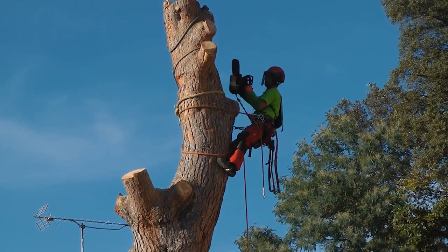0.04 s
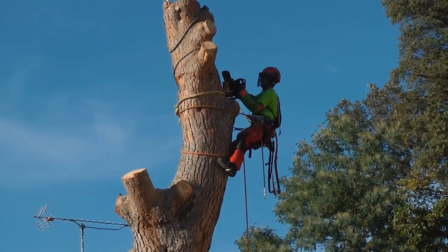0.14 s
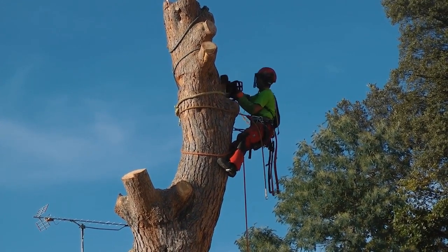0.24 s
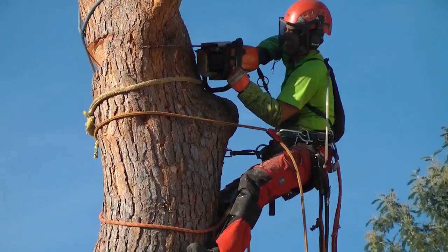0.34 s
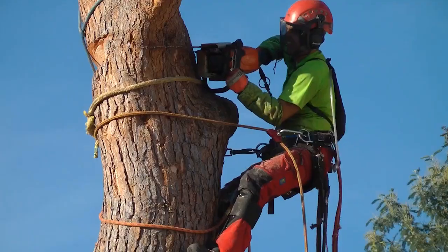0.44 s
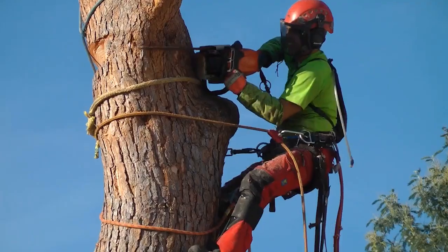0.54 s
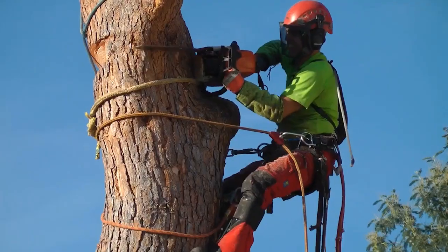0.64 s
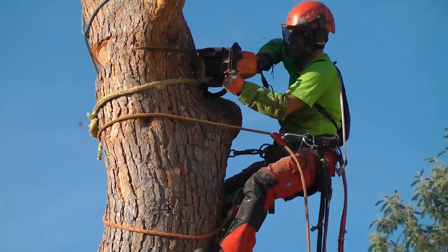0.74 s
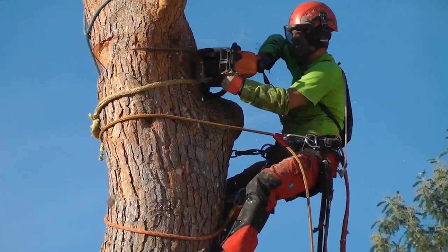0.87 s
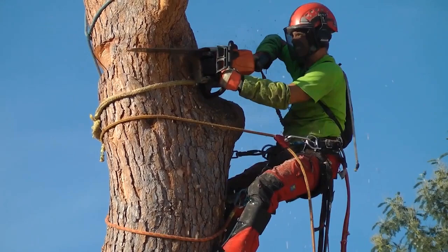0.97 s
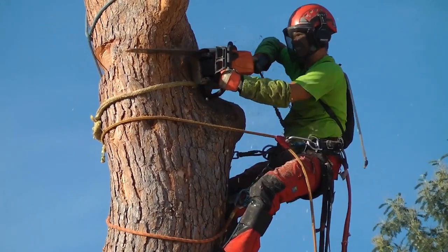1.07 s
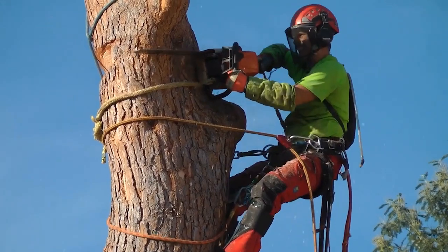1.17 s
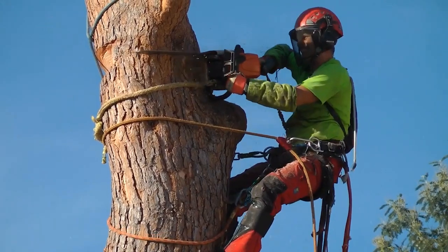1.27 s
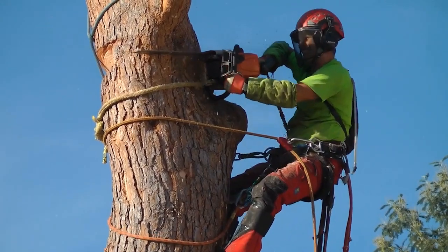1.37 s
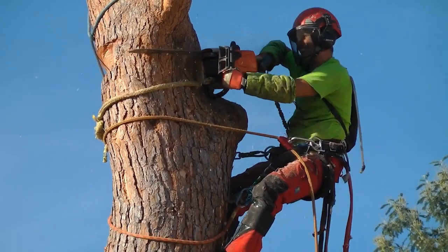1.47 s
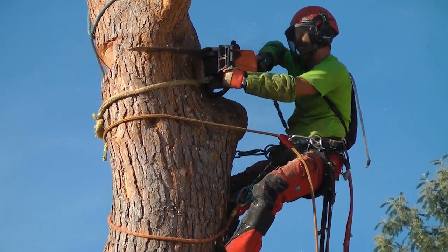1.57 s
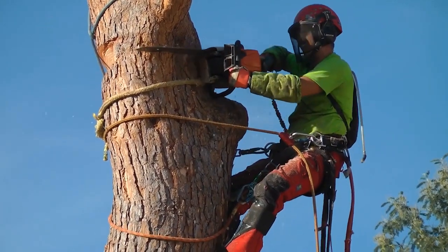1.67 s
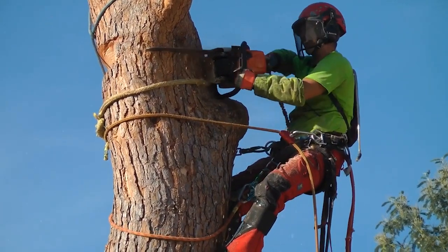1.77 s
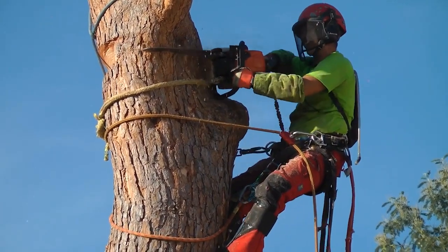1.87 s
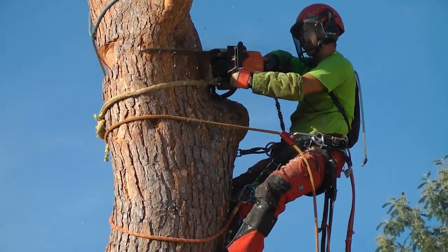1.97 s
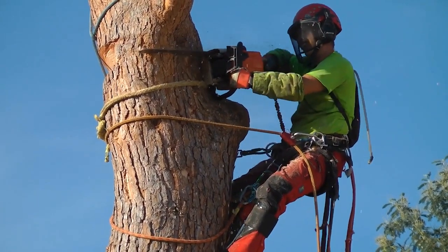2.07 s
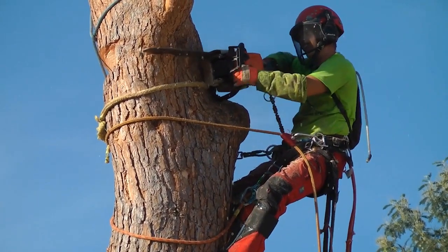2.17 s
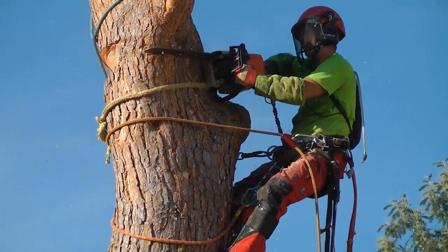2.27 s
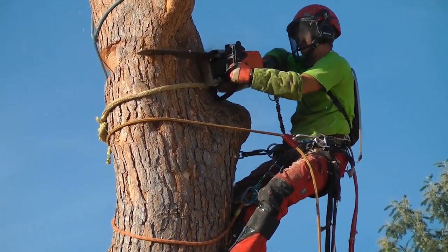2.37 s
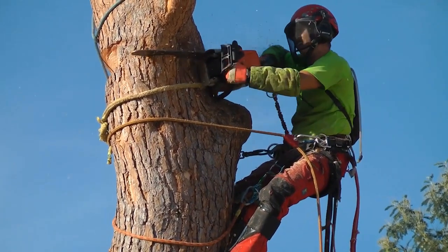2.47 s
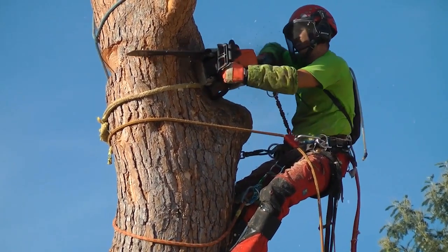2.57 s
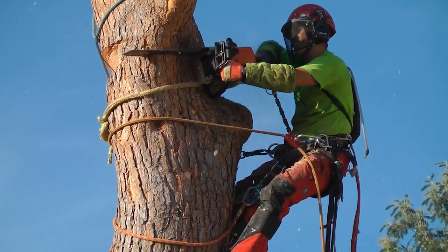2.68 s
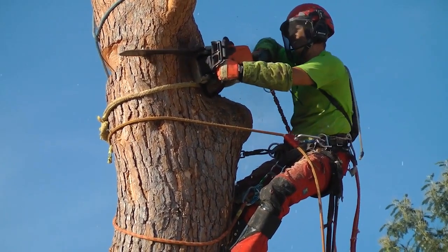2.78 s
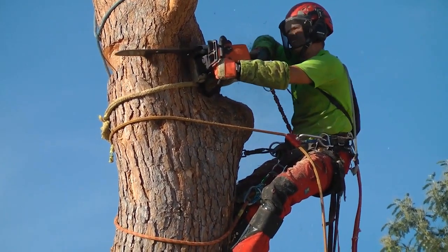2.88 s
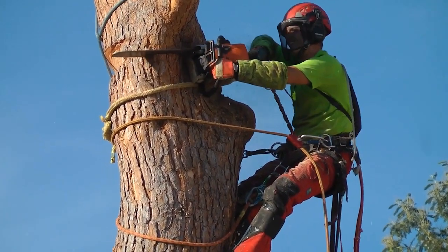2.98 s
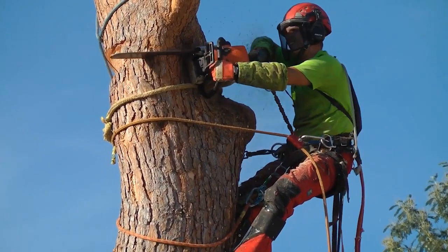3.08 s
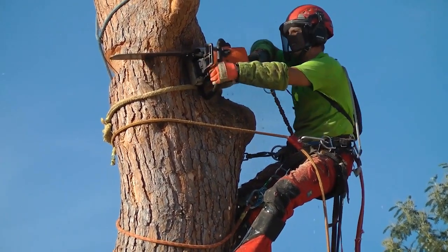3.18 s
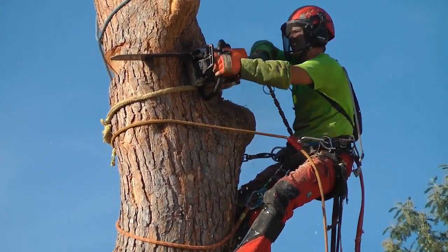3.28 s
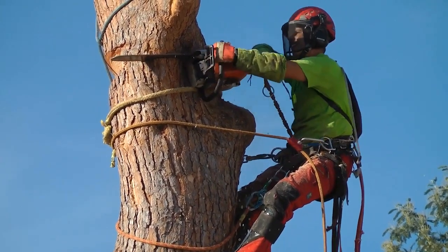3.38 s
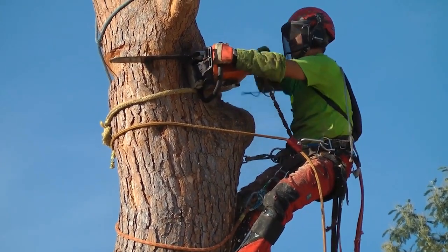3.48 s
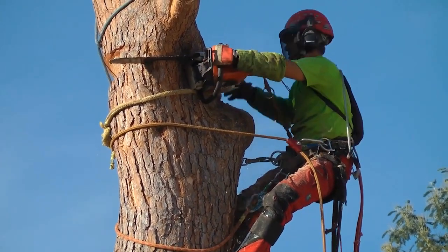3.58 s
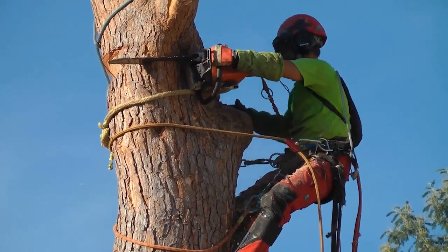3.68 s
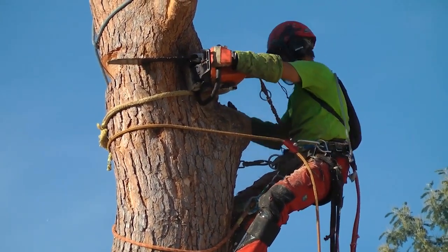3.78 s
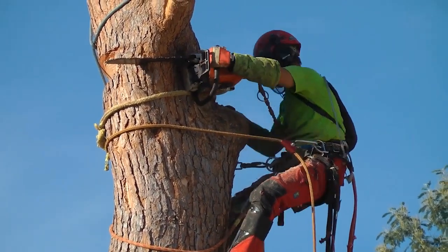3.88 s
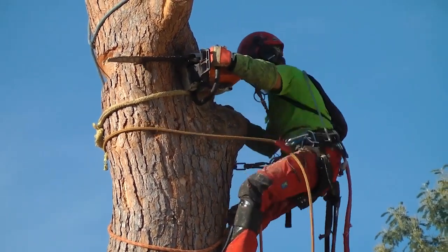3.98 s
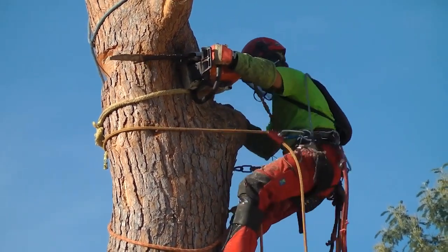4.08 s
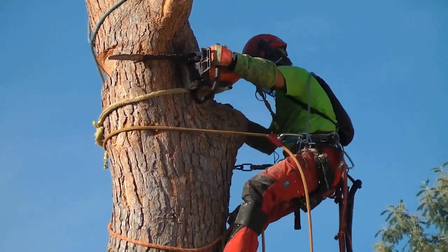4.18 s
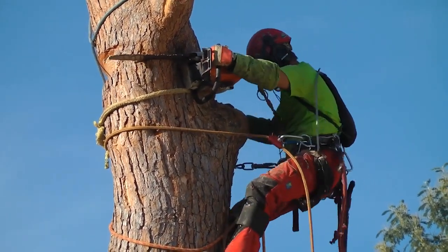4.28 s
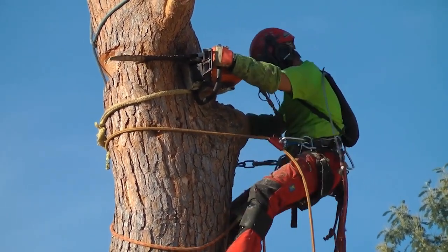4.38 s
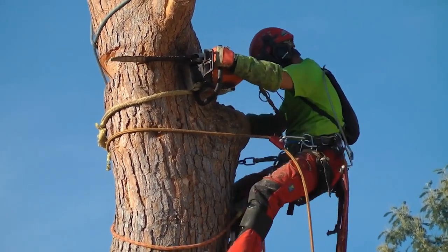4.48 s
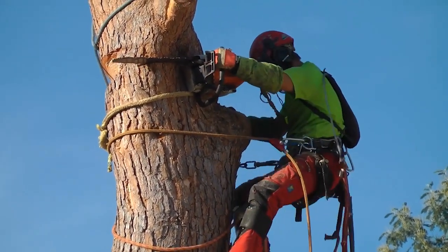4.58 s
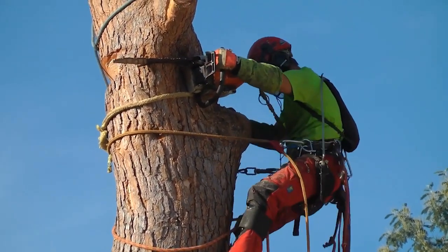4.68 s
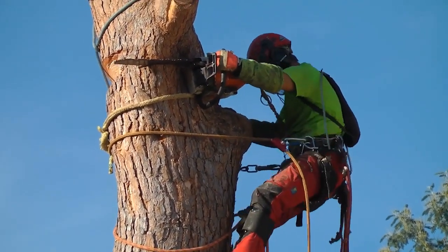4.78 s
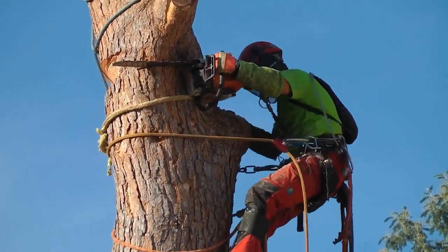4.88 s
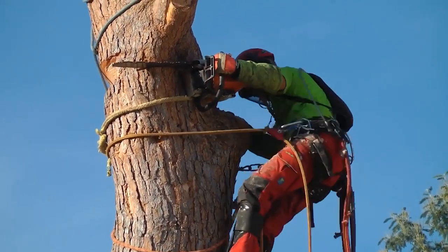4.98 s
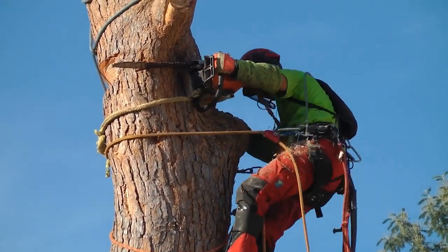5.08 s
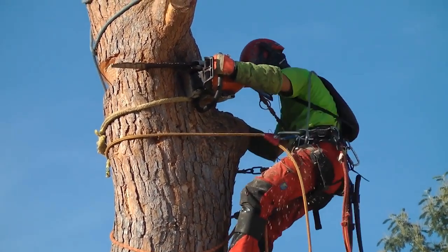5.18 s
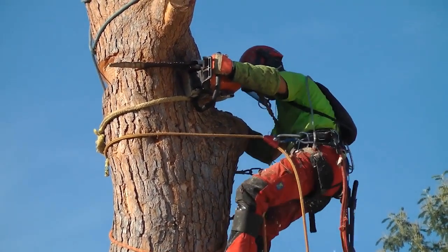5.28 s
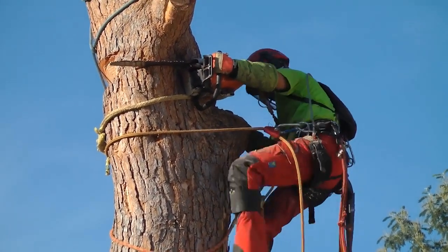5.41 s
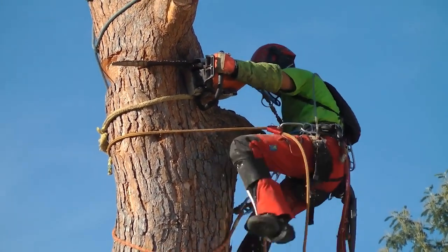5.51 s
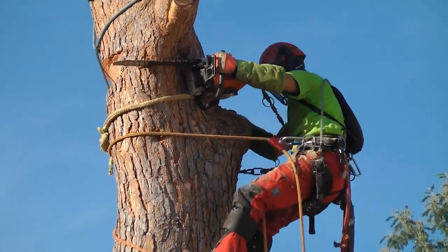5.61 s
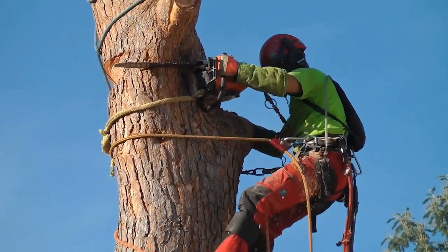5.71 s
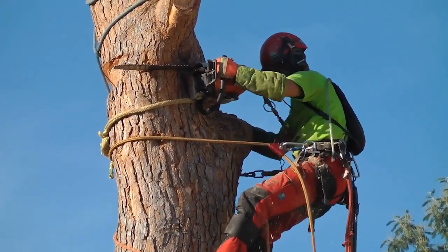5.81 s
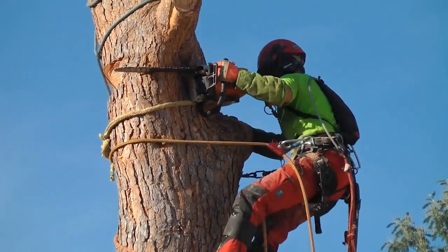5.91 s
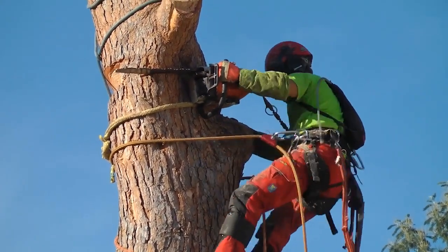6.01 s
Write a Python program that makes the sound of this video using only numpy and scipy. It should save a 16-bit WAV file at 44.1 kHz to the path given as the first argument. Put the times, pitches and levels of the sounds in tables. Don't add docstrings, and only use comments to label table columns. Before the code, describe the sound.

A small two-stroke chainsaw idles faintly, jumps closer, revs hard into a trunk, bogs once, then runs down to a lumpy, rattling idle outdoors.

```python
import sys
import numpy as np
from scipy import signal
from scipy.fft import rfft, irfft, next_fast_len
from scipy.io import wavfile
from scipy.ndimage import uniform_filter1d

SR = 44100
rng = np.random.default_rng(int(sys.argv[2]) if len(sys.argv) > 2 else 0)


def put_to_file(sound):
    columns = np.atleast_2d(sound).T
    safe = np.clip(columns, -1, 1)
    whole_steps = np.round(safe * 32767)
    wavfile.write(sys.argv[1], SR, whole_steps.astype(np.int16))


def boost(x):
    u = np.asarray(x, float) / 20
    return 10 ** u


N = 266805

NEARER_S = .44
THROTTLE_S = .6675
SHUT_S = 3.24


def saw():
    t = np.arange(N) / SR
    hz, exhaust_db, rattle_db, throttle, misfire, whine_db = controls(t)
    hz = uniform_filter1d(hz, 300)
    throttle, misfire = np.clip([throttle, misfire], 0, 1)
    misfire = np.maximum(misfire, (1 - throttle) * np.clip((140 - hz) / 55, 0, .6))
    far = np.clip((NEARER_S - t) / .01, 0, 1)
    load = np.clip((hz - 150) / 120, 0, 1)
    turns = crank(hz, misfire)
    luck = rng.random((2500, 2))
    burn = np.cos(np.pi * np.cumsum(.2 + .16 * luck[:, 0])) ** 2 * (.15 + luck[:, 1])
    depth = np.interp(np.arange(1, 2501), turns, misfire)
    strength = 1 + depth * 1.1 * (burn - .45)

    fire = pulses(turns, strength)
    shut = shut_muffler(fire, turns, strength, burn, misfire, load, far)
    opened = open_muffler(fire, turns, luck[:, 1], hz)
    exhaust = throttle * evened(opened, size=3000) + (1 - throttle) * shut
    exhaust = trunk_echo(exhaust, np.clip((hz - 105) / 30, 0, 1))

    load = np.maximum(load, .7 * throttle)
    rattle = evened(casing(turns, strength, misfire, load, far))
    scream = boost(whine_db) * np.clip((hz - 105) / 60, 0, 1) * whine(hz, turns, flare_db=2.8)
    mix = boost(exhaust_db - 1) * evened(exhaust, size=3000) + boost(rattle_db + .5) * (rattle + scream)
    return mix + fan(t, hz, turns, throttle, load)


# (time [s], speed aimed at [firings/s], lag [s], exhaust level [dB], rattle level [dB])
ENGINE_STAGES = [(0, 98, 0.0098, -48, -39.5), (.435, 101, .003, -38.5, -36), (.649, 140, 0.0077, -31, -37),
                 (.663, 132.5, .002, -36.5, -30.5), (.75, 365, 0.1, -36, -27.5),
                 (1.196, 507, 0.11, -34.5, -26.5), (1.297, 345, 0.095, -40, -29),
                 (1.462, 379, .04, -39, -27), (1.657, 437, 0.069, -36.5, -26.5),
                 (1.839, 280, 0.041, -35.5, -22.5), (1.926, 270, .002, -34, -24),
                 (1.927, 338, .026, -35, -29), (2.055, 382, .055, -38.5, -26.5),
                 (2.239, 422, 0.026, -36.5, -26.5), (2.515, 382, .023, -38.5, -26.5),
                 (2.652, 389, 0.0072, -39, -26.5), (2.788, 401, .018, -36, -26),
                 (3.119, 334.7, 0.069, -39.5, -27.5), (3.225, 126, .108, -32, -30.5),
                 (3.511, 97, 0.049, -33.5, -27.5), (3.62, 100.5, 0.031, -36.5, -32.5),
                 (3.75, 96, .14, -38.5, -36.5)]


def controls(t):
    shut_lag_s, open_db, flutter_db = .006, 11, .72
    bog_s, bog_length_s, bog_throttle, bog_misfire, bog_whine_db = 1.855, .076, .17, .26, -5
    idle_misfire, run_misfire, coast_misfire, hunt_hz = .784, .065, .22, 1.504
    whine_slow_db, whine_fast_db, whine_coast_db = -9.5, 0, -5.5

    s, aim_hz, lag_s, exhaust_db, rattle_db = np.transpose(ENGINE_STAGES)
    coarse = t[::32]
    steps = settle(coarse, s[1:, None], lag_s[1:, None])
    hz, exhaust_db, rattle_db = (np.interp(t, coarse, c[0] + np.diff(c) @ steps)
                                 for c in (aim_hz, exhaust_db, rattle_db))
    flutter, hunt = slow_drift(2)
    opened = settle(t, THROTTLE_S - .005, .001) - settle(t, SHUT_S, shut_lag_s)
    bog = settle(t, bog_s, .007) - settle(t, bog_s + bog_length_s, .002)
    idling = (1 - opened) * np.clip((110 - hz) / 8, 0, 1)
    throttle = opened * (1 - (1 - bog_throttle) * bog)
    misfire = run_misfire + (idle_misfire - run_misfire) * idling + (bog_misfire - run_misfire) * bog
    misfire = np.maximum(misfire, coast_misfire * (1 - opened))
    whine_db = whine_slow_db + (whine_fast_db - whine_slow_db) * np.clip((hz - 265) / 85, 0, 1)
    whine_db = opened * (whine_db + bog_whine_db * bog) + (1 - opened) * whine_coast_db
    exhaust_db = exhaust_db + throttle * (open_db + flutter_db * flutter)
    return hz + hunt_hz * idling * hunt, exhaust_db, rattle_db, throttle, misfire, whine_db


def crank(hz, misfire):
    wobble = evened(uniform_filter1d(rng.standard_normal(N), 1500))
    turns = np.cumsum(hz * (1 + (.0008 + .012 * misfire ** 2) * wobble)) / SR
    return turns + -turns[round(THROTTLE_S * SR)] % 1


# (frequency [Hz], level [dB])
OPEN_COLOUR = [(100, -28), (260, -9), (330, -9), (385, -15), (425, -12), (500, -6), (680, -1), (800, -3),
               (1000, 0), (1250, 0), (1400, -3), (1520, -3), (1600, 1), (1710, -4), (1800, -11),
               (2300, -17), (5000, -80)]
# (frequency [Hz], level [dB])
BARK_COLOUR = [(60, -45), (130, -17), (260, -9), (400, -14), (520, -7), (760, -14), (1010, 0), (1200, 1),
               (1450, 1), (1650, -1), (1900, -18), (2400, -18), (4000, -70)]


def open_muffler(fire, turns, luck, hz):
    smear = smeared(pulses(turns, .55 + .9 * luck), spread_s=.012)
    bark = evened(colour(smear, BARK_COLOUR, [(1600, 90, 5)]))
    revved = np.clip((hz - 230) / 85, 0, 1)
    return revved * evened(colour(fire, OPEN_COLOUR)) + (1 - revved) * bark


# (frequency [Hz], level [dB])
SHUT_COLOUR = [(80, -36), (200, -25), (290, -14), (380, -17), (480, -12), (570, -13), (780, -19),
               (960, -11), (1160, -14), (1280, -24), (2000, -32), (4000, -70)]
# (frequency [Hz], width [Hz], level [dB])
SHUT_CHAMBERS = [(665, 50, 14), (880, 90, 1)]
# (frequency [Hz], level [dB])
POP_COLOUR = [(100, -40), (300, -16), (500, -9), (660, -3), (780, -7), (950, 0), (1160, 0), (1280, -8),
              (1450, -6), (2000, -18), (4000, -60)]
# (frequency [Hz], level [dB])
PUFF_COLOUR = [(100, -34), (250, -5.5), (470, -5), (600, 0.5), (900, -6), (1150, -5.5), (1400, -24.5),
               (2200, -22), (4000, -42)]
# (frequency [Hz], level [dB])
COAST_COLOUR = [(100, -21), (250, 10.5), (400, -1), (620, 9.5), (900, 8), (1150, 2), (1400, 11), (1700, 6),
                (2300, 11), (3000, -41), (5000, -118)]
# (frequency [Hz], level [dB])
FAR_COLOUR = [(47, -46), (80, -7), (195, -42), (295, -6), (371, -27), (520, 4), (611, -21), (690, -4),
              (1050, -6), (1630, -31), (2000, -10), (2600, -48), (4400, -120)]


def shut_muffler(fire, turns, strength, burn, misfire, load, far):
    even = .55 + .45 * strength
    ports = pulses(turns, even) + .7 * pulses(turns + .5 + .1 * misfire, even)
    pops = .75 * misfire * evened(colour(pulses(turns, burn + .25), POP_COLOUR))
    gas = burn[turns.astype(int)] ** .033 * rng.standard_normal(N)
    puffs = 1.15 * misfire * evened(colour(gas, PUFF_COLOUR))
    idle = evened(evened(colour(ports, SHUT_COLOUR, SHUT_CHAMBERS)) + pops + puffs)
    near = load * evened(colour(fire, COAST_COLOUR)) + (1 - load) * idle
    return far * evened(colour(fire, FAR_COLOUR)) + (1 - far) * near


def trunk_echo(x, load):
    delays_s, spread_db = (.0007, .0016, .0029), -14
    rock = slow_drift(len(delays_s))
    echoes = sum(r * np.roll(x, round(s * SR)) for r, s in zip(rock, delays_s))
    return x + boost(spread_db) * load * echoes


# (frequency [Hz], level [dB])
LOADED_COLOUR = [(88, -70), (150, -27), (328, -10), (398, -4), (494, -6), (790, -3), (871, -5.5),
                 (1190, -2), (2180, -1.5), (2920, -9), (5790, -4), (6260, 0.5), (8400, -4.5), (11900, -4.5),
                 (16000, -8.5)]
# (frequency [Hz], level [dB])
IDLE_COLOUR = [(760, -19.5), (1300, -2.5), (3840, -6), (4080, -5), (4440, -6), (6090, 0), (6620, -4.5),
               (7750, -4.5), (10200, -5.5), (11800, -8), (16000, -13)]
# (frequency [Hz], level [dB])
FAR_CASING_COLOUR = [(88, -46), (150, -17), (514, -6), (612, -8), (1080, -10), (1390, -11.5), (2100, -16),
                     (2700, -14.5), (5150, -9.5), (11900, -17), (16000, -24)]
# (frequency [Hz], width [Hz], level over the colour [dB])
NEAR_PARTS = [(2420, 150, 2.5), (3230, 175, 3.5), (3556, 130, 5.5), (4117, 75, 17), (4710, 32, 6),
              (5320, 290, 8), (6230, 34, 15.5), (6600, 53, 5), (7420, 170, -1.5), (7720, 205, 7),
              (8360, 36, 7.5), (9280, 54, 1.5), (10630, 150, 2), (11820, 76, 11.5), (14100, 38, -34)]
# (frequency [Hz], width [Hz], level over the colour [dB])
FAR_PARTS = [(2160, 260, 5.1), (3617, 99, 4.5), (4150, 150, 7.6), (5180, 120, 8), (6200, 173, 2.8),
             (6700, 70, 3.4), (7780, 170, 8.5), (7380, 73, 8.4), (9200, 160, 5), (10500, 300, 4.6),
             (11800, 380, 4.1), (14200, 250, 4)]
# (frequency [Hz], level [dB])
CHAIN_HUSH = [(150, 0), (300, -2), (480, -9), (850, -8), (1100, 0), (16000, 0)]


def casing(turns, strength, misfire, load, far):
    gate = 1.1 + strength[turns.astype(int)] * np.exp(-(turns % 1) / .2) * (.5 + 1.4 * misfire)
    gusts = boost(.6 * evened(uniform_filter1d(rng.standard_normal(N), 500)))
    shake = gate * gusts * rng.standard_normal(N)
    near = evened(colour(shake, IDLE_COLOUR, NEAR_PARTS))
    idle = far * evened(colour(shake, FAR_CASING_COLOUR, FAR_PARTS)) + (1 - far) * near
    damped = [(mode_hz, 3 * width, .45 * db) for mode_hz, width, db in NEAR_PARTS]
    loaded = evened(colour(colour(shake, CHAIN_HUSH), LOADED_COLOUR, damped))
    return np.sqrt(load) * loaded + np.sqrt(1 - load) * idle


# (frequency [Hz], level [dB])
WHINE_COLOUR = [(200, -12), (400, -2), (1200, 6), (1800, 11.5), (2500, -0.5), (3500, 4.5), (5000, 0.5),
                (8000, -0.5), (12000, 2.5), (13500, -3), (16000, -21)]
# (frequency [Hz], width [Hz], level [dB])
WHINE_PARTS = [(2450, 300, 5), (2790, 200, 4), (4170, 300, 11), (4700, 220, 6), (5600, 200, 7),
               (6230, 380, 17), (8050, 300, 8), (8850, 220, 9), (9290, 220, 10), (10450, 300, 7),
               (10980, 220, 10), (11650, 350, 7)]


def whine(hz, turns, flare_db):
    at, out = np.arange(0, N, 256), np.zeros(N)
    for order in range(1, 38):
        drift = uniform_filter1d(uniform_filter1d(rng.standard_normal(len(at)), 9), 5)
        flares = flare_db * evened(drift, size=400)
        size = gain_at(order * hz[at], WHINE_COLOUR, WHINE_PARTS, order=6) * boost(flares)
        out += np.interp(np.arange(N), at, size) * np.sin(2 * np.pi * (order * turns + rng.random()))
    return evened(out, size=30000)


# (blade frequency [Hz], level [dB])
FAN_SHROUD = [(1750, -70), (2050, -36), (2320, -29.5), (2650, -44), (3400, -40), (4800, -48)]


def fan(t, hz, turns, throttle, load):
    blades = 14
    unsteady = 1 + .5 * evened(uniform_filter1d(rng.standard_normal(N), 250))
    level = unsteady * (t > SHUT_S) * (1 - throttle) * gain_at(blades * hz, FAN_SHROUD)
    return level * (np.sin(2 * np.pi * blades * turns) + .91 * load * np.sin(np.pi * blades * turns))


# (time [s], peak level [dB])
CLIP_TICKS = [
    (5.7792, -16),
]


def harness():
    out, t = np.zeros(N), np.arange(1500) / SR
    swell = (t / .008) * np.exp(-t / .008)
    for s, db in CLIP_TICKS:
        scratch = swell * np.diff(rng.standard_normal(1501))
        out[round((s - .008) * SR):][:1500] += boost(db - 15) * scratch
    return out


# (frequency [Hz], level [dB])
WIND_COLOUR = [(12, -20), (20, -10.5), (86, -7.5), (188, -8.5), (250, -7.5), (320, -39), (550, -120)]
# (time [s], level [dB])
GUST = [
    (0, -77),
    (.55, -75),
    (.75, -63),
    (1.6, -61),
    (3.1, -61.5),
    (4.6, -72.5),
    (6.05, -73),
]


def wind():
    level = boost(np.interp(np.arange(N) / SR, *np.transpose(GUST)))
    lumps = boost(1.7 * evened(uniform_filter1d(rng.standard_normal(N), 4000), size=80000))
    left, right = (evened(colour(rng.standard_normal(N), WIND_COLOUR), size=40000) for _ in range(2))
    return level * lumps * np.array([boost(-3) * left, boost(10) * right])


def evened(x, size=6000):
    return x / np.sqrt(abs(uniform_filter1d(x ** 2, size)) + 1e-20)


def slow_drift(count):
    noise = rng.standard_normal((count, N))
    return evened(uniform_filter1d(uniform_filter1d(noise, 2500), 1200), size=60000)


def settle(t, s, lag_s):
    u = np.maximum(t - s, 0) / np.maximum(lag_s, 1e-3)
    return 1 - (1 + u) * np.exp(-u)


def pulses(turns, size_of):
    at = np.interp(np.arange(1, int(turns[-1])), turns, np.arange(N))
    place = np.round(at)[:, None] + np.arange(-8, 9)
    shape = np.sinc(place - at[:, None]) * np.hanning(19)[1:-1]
    out = np.zeros(N + 20)
    np.add.at(out, np.clip(place, 0, N).astype(int), size_of[:len(at), None] * shape)
    return out[:N]


def smeared(x, spread_s):
    size = next_fast_len(N + 4096)
    hz = np.fft.rfftfreq(size, 1 / SR)
    return irfft(rfft(x, size) * np.exp(-1j * np.pi * spread_s * hz ** 2 / 16000), size)[:N]


def gain_at(hz, points, ring=(), order=2):
    f, db = np.transpose(points)
    gain = boost(np.maximum(np.interp(np.log(hz + 1), np.log(f + 1), db), -100))
    for mode_hz, width, top_db in ring:
        gain = gain * np.sqrt(1 + boost(2 * top_db) / (1 + (2 * (hz - mode_hz) / width) ** order))
    return gain


def colour(x, points, ring=()):
    log = np.log(gain_at(np.fft.rfftfreq(8192, 1 / SR), points, ring))
    log = np.concatenate([log, log[-2:0:-1]])
    taps = np.fft.ifft(np.exp(log - 1j * signal.hilbert(log).imag)).real[:4096]
    return signal.oaconvolve(x, taps)[:N]


# (frequency [Hz], level [dB])
SIDE_SCATTER = [(100, -6), (250, -8), (500, -16), (1000, -12), (2000, -11), (4000, -17), (8000, -16.5),
                (14000, -20)]


def scene():
    direct = saw() + harness()
    t = np.arange(4000) / SR
    echoes = rng.standard_normal((2, 4000)) * boost(-60 * t / .13)
    echoes /= np.linalg.norm(echoes[0])
    side, middle = (signal.oaconvolve(direct, e)[:N] for e in echoes)
    side = colour(side, SIDE_SCATTER)
    return direct + boost(-15) * middle + np.array([side, -side]) + wind()


def band_limit(x):
    return signal.sosfilt(signal.butter(12, 16190, fs=SR, output="sos"), x)


def record(dry):
    edge_hz = 15740
    low_pass = signal.firwin(1023, edge_hz, window=("kaiser", 9), fs=SR)
    limited = signal.oaconvolve(dry, low_pass[None], "same")
    return band_limit(limited)


dry = scene()
out = record(dry)
put_to_file(out)
```